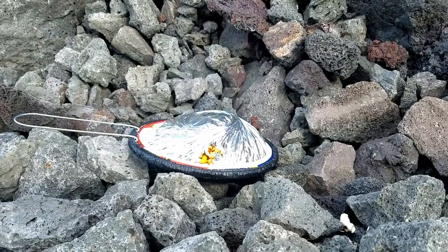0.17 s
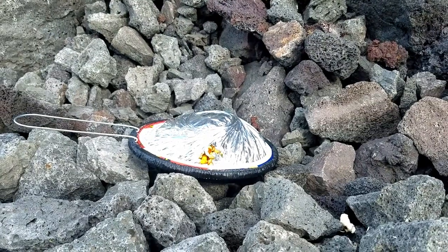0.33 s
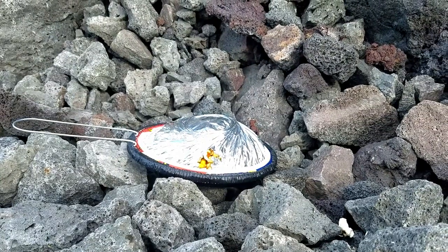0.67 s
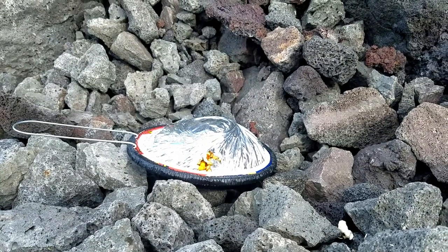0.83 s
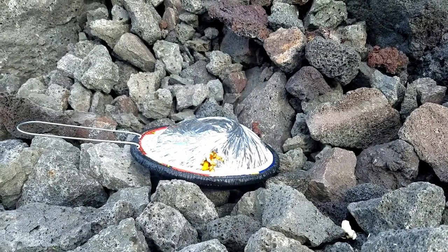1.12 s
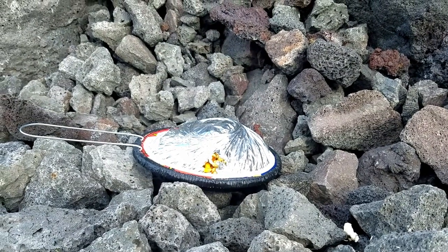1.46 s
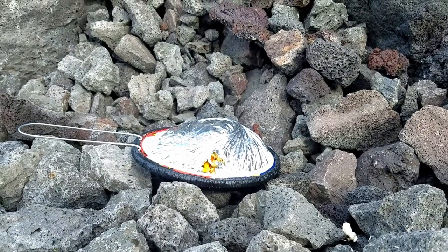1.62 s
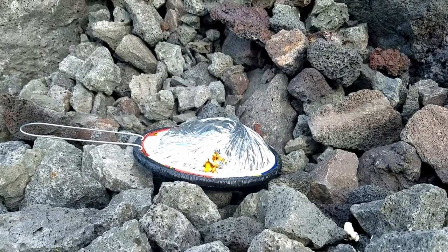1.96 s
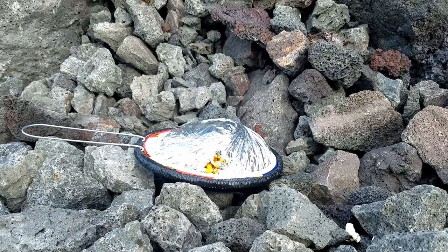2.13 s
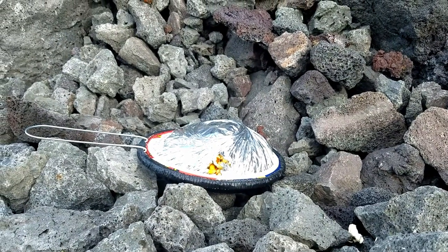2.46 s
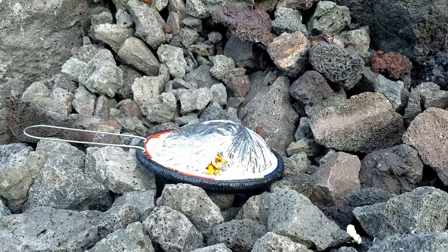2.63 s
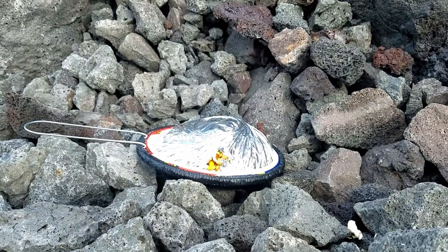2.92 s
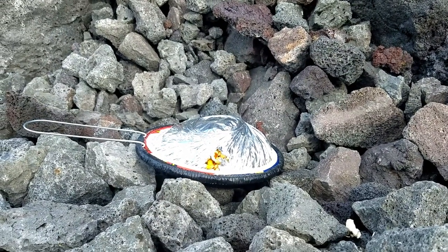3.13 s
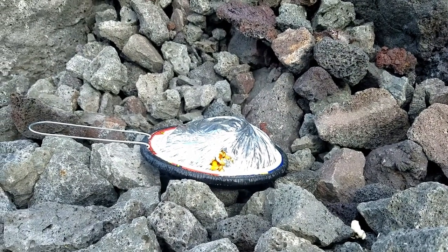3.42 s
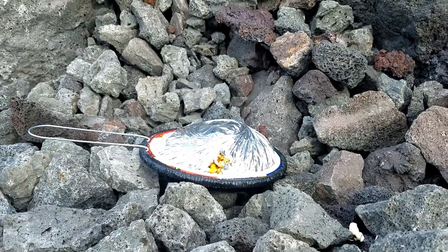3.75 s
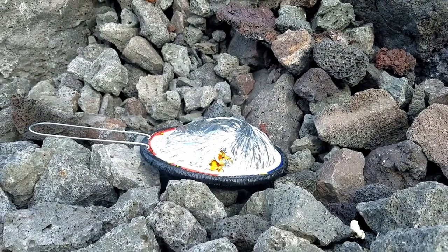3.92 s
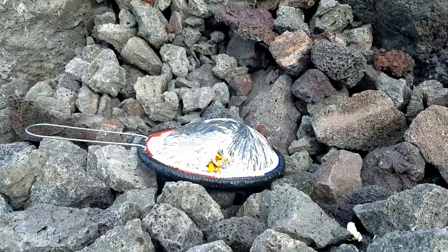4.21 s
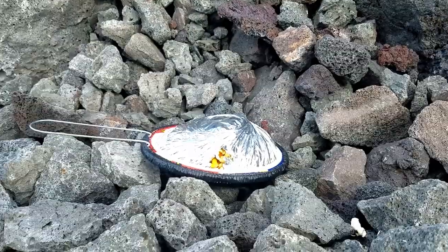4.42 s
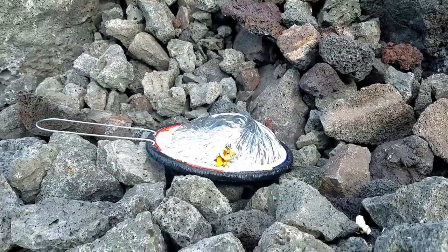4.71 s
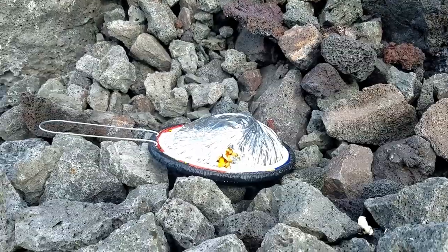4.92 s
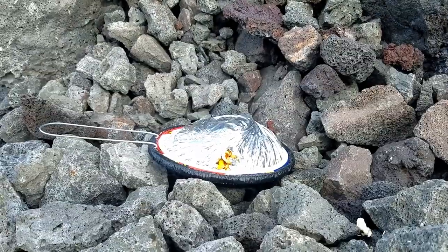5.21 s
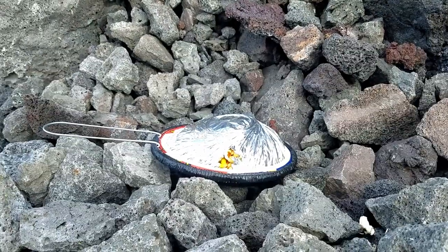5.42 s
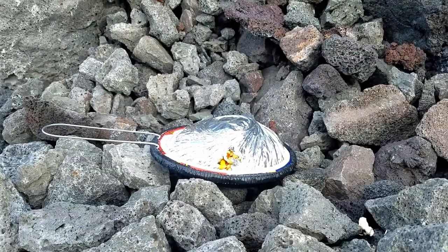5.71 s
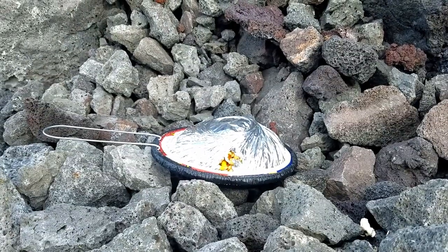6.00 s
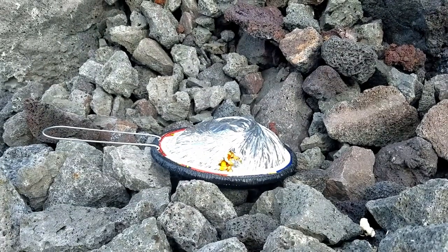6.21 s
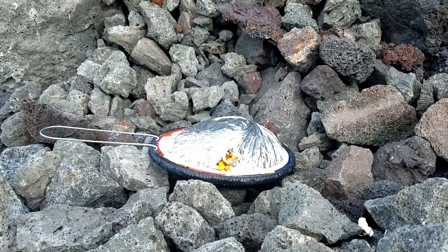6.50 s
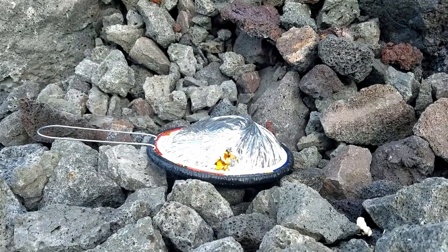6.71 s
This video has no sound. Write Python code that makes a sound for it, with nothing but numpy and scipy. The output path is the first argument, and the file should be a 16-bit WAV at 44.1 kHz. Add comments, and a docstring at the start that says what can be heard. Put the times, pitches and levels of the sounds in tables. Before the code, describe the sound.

Close outdoor stereo pickup of a foil-domed popcorn pan on rocks. Sparse dull ticks lead to a few pops, loudest just before one and a half seconds, each a tinny knock with brief rattle and settling bounces. More pops follow singly, with a long lull in the middle. Light wind rumbles low at the microphone, over quiet hiss and faint, very high insect-like whistles.

```python
"""Outdoors, close to a pan on hot rocks: popcorn bursts under the pan's foil dome, heard by two microphone ports.
Each kernel strikes the foil and bounces: clusters of knocks excite damped foil modes, with rattle and creases.
Dull single ticks, of the pan or of a kernel's small bounces, are each one short push and pull of air. Filtered
noise makes the light wind that buffets each port apart, the far wash of air and the hiss of the microphone.
Faint, very high whistles, perhaps an insect, are narrow bands of noise carried on sines."""
import sys
import numpy as np
from scipy import signal
from scipy.io import wavfile
from scipy.ndimage import uniform_filter1d

SR = 44100
rng = np.random.default_rng(int(sys.argv[2]) if len(sys.argv) > 2 else 0)


def to_linear_factor(level_db):
    """Convert decibel levels (scalar or array-like) to linear amplitude factors."""
    exponent = np.asarray(level_db, float) / 20
    return 10 ** exponent


def transcribe(signal):
    """Save signal, clipped to [-1, 1], as a 16-bit WAV file at the path in sys.argv[1]."""
    frames = np.atleast_2d(signal).T
    limited = np.clip(frames, -1, 1)
    pcm = np.round(limited * 32767).astype(np.int16)
    wavfile.write(sys.argv[1], SR, pcm)


N = 302967  # samples

# bursts of kernels: start_s, crinkle_db and snap_db (above the foil ring), push_db (low push of air),
# rattle_db (foil ring of the rattle at its start), rattle_fall_ms (to fall 6 dB)
BURSTS = [(0.971, -7.5, -7, -21, -47, 29), (1.25, -5.5, -10, -14.5, -46, 20),
          (1.4133, -5, -7, -18, -39, 10), (1.4602, -1, -13, -22, -45, 66),
          (2.3924, -8, -13, -16, -42.5, 29), (2.809, -1.5, 2.5, -6.5, -45.5, 40),
          (4.8025, -6.5, -11.5, -20, -52, 9), (4.903, -3, -6, -20.5, -41.5, 43),
          (5.677, -8.5, -5.5, -10, -44, 25), (6.496, -3.5, -4, -16, -42.5, 28)]
EDGE_HZ = 15770  # top of the steady sound


def evened(x):
    """Normalization by the mean square: scales to rms 1."""
    return x / np.sqrt(np.mean(x ** 2) + 1e-20)


def read(points, hz):
    """Spectral interpolation on a logarithmic frequency axis."""
    f, value = np.transpose(points)
    return np.interp(np.log(hz + 1), np.log(f + 1), value)


def pair(first, other, alike):
    """Partial coherence: two ports that share the part alike of their signal."""
    alike = np.clip(alike, 0, 1)
    return np.array([first, alike * first + np.sqrt(1 - alike ** 2) * other])


def noise_field(size, alike):
    """Partly coherent Gaussian noise as short-time spectra (ports, bins, frames), with frequencies and times."""
    frames = 4 * N // size + 5
    hz = np.fft.rfftfreq(size, 1 / SR)
    a, b, c, d = rng.standard_normal((frames, len(hz), 4)).T
    t = np.arange(frames) * size / 4 / SR
    return pair(a + 1j * b, c + 1j * d, read(alike, hz)[:, None]), hz, t


def to_sound(spectra, size):
    """Overlap-add synthesis: the inverse short-time transform."""
    return signal.istft(spectra, nperseg=size, noverlap=3 * size // 4)[1][:, :N]


def air():
    """Stationary shaped noise: smooth far wash and microphone hiss, whose spectrum drifts very slightly."""
    # relative spectrum: frequency_hz, density_db
    air_spectrum = [(25, -20), (45, -7), (74, -6.5), (132, -26.5), (388, -14.5), (1090, -20), (1400, -18.5),
                    (1750, -14), (2340, -18), (2600, -22.5), (5590, -30), (9730, -34.5), (12000, -29.5),
                    (15700, -29)]
    # tilt between the ports: frequency_hz, left_over_right_db
    air_balance = [(60, -6.5), (130, 3), (290, -1), (640, -3.5), (1410, 6.5), (3100, 4), (6820, 0.5),
                   (15000, 1.0)]
    # coherence of the ports: frequency_hz, alike (0-1)
    air_alike = [(400, 0.16), (1400, 0)]
    level_db, patchy_db = -58.5, -0.03
    z, hz, t = noise_field(size=2048, alike=air_alike)
    patches = rng.standard_normal((len(t), len(hz))).T
    patches = uniform_filter1d(patches, 20, 0)  # across frequency
    patches = evened(uniform_filter1d(patches, 8, 1))  # along time
    half = read(air_balance, hz) / 2
    colour_db = read(air_spectrum, hz) - 40 * (hz > EDGE_HZ) + np.array([half, -half])
    shaped = z * to_linear_factor(colour_db[..., None] + patchy_db * patches)
    return to_linear_factor(level_db) * evened(to_sound(shaped, size=2048))


def wind():
    """Turbulent pressure at nearly unrelated ports: lumpy rumble with puffs; stronger wind reaches higher."""
    # breeze between the puffs, before lumps and flutter: time_s, left_db, right_db
    breeze_table = [(0, -70, -68.5), (1.0, -73, -63.5), (2.2, -66.5, -61), (3.0, -70.5, -70.5),
                    (4.2, -64.5, -64), (5.0, -66.5, -66), (6.0, -62, -66.5), (6.87, -62, -66.5)]
    # strong puffs on one port: centre_s, level_db, port (0 left, 1 right), length_ms (between points 5 dB down)
    puff_table = [(0.113, -55, 0, 24), (0.164, -55.5, 0, 58), (0.209, -50.5, 1, 55), (0.389, -52, 1, 34),
                  (0.438, -52, 1, 16), (0.604, -46.5, 1, 27), (0.678, -54, 1, 29), (1.549, -53, 0, 46),
                  (1.669, -51, 1, 17), (2.024, -55.5, 1, 31), (3.507, -52.5, 1, 22), (3.879, -51.5, 0, 25),
                  (4.241, -54, 1, 44), (4.31, -55, 1, 20), (5.42, -53, 0, 36), (5.551, -51.5, 0, 73),
                  (5.706, -50, 0, 48), (5.971, -56, 0, 19), (6.03, -49.5, 0, 27), (6.105, -51, 0, 12),
                  (6.164, -49, 0, 91), (6.299, -45, 0, 51), (6.398, -51.5, 1, 49), (6.476, -50, 0, 67),
                  (6.631, -53.5, 0, 61)]
    # relative spectra of weak and of strong wind: frequency_hz, density_db
    calm_spectrum = [(25, -11), (60, -5.5), (120, -9.5), (220, -8), (400, -46), (800, -51)]
    gust_spectrum = [(25, -35), (60, 2.5), (120, -5), (220, -7.5), (400, -10.5), (800, -50)]
    lumps_db, flutter_db = 5.0, 2.0
    dull_db, bright_db = -66, -50  # levels at which the wind is wholly calm and wholly gusty in colour
    z, hz, t = noise_field(size=1024, alike=[(30, 0.15), (300, 0.24)])  # (Hz, coherence)

    lumps = evened(uniform_filter1d(rng.standard_normal((len(t), 2)).T, size=5))
    when, *breeze_db = np.transpose(breeze_table)
    breeze_db = np.array([np.interp(t, when, db) for db in breeze_db])
    level = to_linear_factor(breeze_db + lumps_db * lumps)
    for s, db, port, length_ms in puff_table:
        level[round(port)] += to_linear_factor(db) * np.exp(-(1500 * (t - s) / length_ms) ** 2)
    flutter = evened(uniform_filter1d(rng.standard_normal((len(t), 2)).T, size=3))
    level *= to_linear_factor(flutter_db * (flutter - .5))

    gusty = np.clip((20 * np.log10(level) - dull_db) / (bright_db - dull_db), 0, 1)[:, None]
    calm_db = read(calm_spectrum, hz)[:, None]
    gust_db = read(gust_spectrum, hz)[:, None]
    colour = to_linear_factor((1 - gusty) * calm_db + gusty * gust_db)
    colour /= np.sqrt((colour ** 2).sum(1, keepdims=True))  # the colour leaves the power alone
    steady = np.std(to_sound(z * colour, size=1024))
    return to_sound(z * colour * level[:, None], size=1024) / steady


def push_and_pull(turns):
    """Transient radiation: a cosine under a Gaussian envelope, as a function of its cycles since the start."""
    width = 0.39  # cycles
    return np.cos(2 * np.pi * (turns - .7)) * np.exp(-((turns - .6) / width) ** 2)


def ticks():
    """Impulsive radiation and reflection: each short push and pull of air has a weak echo off the rocks."""
    # dull single ticks, of the pan or of a kernel's small bounces: start_s, level_db, pitch_hz
    tick_table = [(0.145, -40.5, 1240), (0.634, -37.5, 1050), (1.046, -47, 800), (1.061, -48, 829),
                  (1.074, -47, 902), (1.086, -53, 1560), (1.118, -46, 945), (1.731, -38.5, 1160),
                  (1.869, -39.5, 1200), (2.05, -37.5, 1170), (2.225, -41, 970), (3.113, -49, 910),
                  (3.138, -46.5, 394), (3.279, -44, 750), (3.419, -42, 937), (3.55, -46.5, 783),
                  (3.684, -41.5, 977), (4.177, -41, 890), (4.764, -37.5, 930), (6.584, -34.5, 1040),
                  (6.67, -45, 1370)]
    echo_ms, echo_db = 1.73, -11
    out = np.zeros(N)
    for s, db, hz in tick_table:
        turns = np.arange(-120, 300) / SR * hz
        late = turns - echo_ms / 1000 * hz
        tick = push_and_pull(turns) + to_linear_factor(echo_db) * push_and_pull(late)
        out[round(s * SR) - 60:][:len(turns)] += to_linear_factor(db) * tick
    return out


def whistles():
    """Modulation of a carrier: slow noise on a high sine makes a narrow, fuzzy tone."""
    # faint, very high whistles, perhaps an insect: start_s, pitch_hz, level_db
    whistle_table = [(.33, 13150, -76), (.83, 13000, -76), (1.28, 12340, -68.5), (2.33, 13050, -76),
                     (3.36, 12800, -76), (3.85, 13000, -73), (4.36, 13150, -73), (4.48, 13150, -78),
                     (4.98, 13000, -72), (5.36, 13250, -72), (5.82, 13200, -71), (6.38, 13200, -73)]
    length_s, fuzz_hz = .085, 110
    out = np.zeros((2, N))
    fuzz = signal.lfilter(*signal.butter(2, fuzz_hz, fs=SR), rng.standard_normal((2, 2, N)))
    fuzz = evened(fuzz[0]) + 1j * evened(fuzz[1])
    for s, hz, db in whistle_table:
        at = np.arange(round(s * SR), round((s + length_s) * SR))
        tone = (fuzz[:, at] * np.exp(2j * np.pi * hz * at / SR)).real
        out[:, at] += to_linear_factor(db) * signal.windows.tukey(len(at), .5) * tone
    return out


def burst_at(s):
    """Causal attribution: index of the burst sounding at time s; a knock may lead its burst by lead_s."""
    lead_s = .025
    return np.maximum(np.searchsorted(np.transpose(BURSTS)[0], s + lead_s) - 1, 0)


# The next four functions return rows of start_s, ring_db, then boom_db, crinkle_db, snap_db above the ring,
# and fall_ms.
def hard_knocks():
    """Impact excitation: the bursting kernel strikes the foil, coloured by its burst and its own brightness."""
    # start_s, ring_db (foil ring), boom_db (dome boom above it), bright_db (added to the burst's crinkle
    # and snap), fall_ms (to fall 6 dB)
    knock_table = [(0.9707, -34, -16, -1, 3.5), (0.9763, -33, -12, 4, 3), (0.9833, -31.5, -1.5, -3, 3.5),
                   (0.989, -38.5, -8, -0.5, 5.5), (1.25, -39, 5, 3, 1.9), (1.2527, -28, -13, -2.5, 5),
                   (1.2635, -39.5, 2, 2.5, 1.5), (1.413, -41, -15, 0, 4), (1.416, -14.5, 2.5, 4.5, 1.6),
                   (1.4195, -12, -0.5, -6, 1.23), (1.425, -29.5, -15, 12.5, 1.7),
                   (1.4308, -30, -4, -2, 2.5), (1.4605, -12.5, -9.5, -1, 2.5), (1.4623, -23, -22, 0, 2.5),
                   (1.467, -22.5, -11, 11, 1.9), (1.4725, -29, 3.5, 3, 2.5), (1.4778, -32, -1, -4, 2),
                   (1.621, -44, -18, -5, 1.7), (2.3922, -26.5, -9, 2, 3.5), (2.399, -34.5, -17, 6.5, 3),
                   (2.4007, -23, -9.5, -12, 1.6), (2.403, -22.5, -30, 1, 1.8), (2.4082, -30, -8.5, -2, 2),
                   (2.414, -36, -22, -1, 5), (2.809, -43, -13, -12, 2), (2.813, -44, -3, 13.5, 3),
                   (2.8174, -41.5, -3, -1, 11), (2.8279, -33.5, 0.5, 1.5, 0.96), (2.8365, -44, -7, -4, 4.5),
                   (2.887, -40, -5, -4, 1.2), (2.932, -42, 3.5, -15, 1.5), (4.8023, -31, -23, -14, 5),
                   (4.8071, -21, -8.5, 2.5, 1.5), (4.8107, -21, -20, -1.5, 1.46),
                   (4.839, -47.5, -1, 10.5, 2), (4.9035, -33, -8, -10, 1.5), (4.905, -18.5, -8.5, 3.5, 1.5),
                   (4.9109, -23.5, 0.5, 0, 3), (4.9157, -23.5, -20, -6, 1.6), (5.6554, -41.5, 3, 0, 1.5),
                   (5.6765, -36.5, 2, 8, 1.56), (5.6829, -46.5, -19, 2.5, 14), (5.6951, -36, 3.5, 0, 1.7),
                   (5.701, -36, -12, -5, 2), (6.4971, -27.5, 5, 1, 2.5), (6.4992, -24.5, 3, 3.5, 2.5),
                   (6.503, -26.5, -7, -3, 3.5)]
    rows = []
    for s, db, boom_db, bright_db, fall_ms in knock_table:
        _, crinkle_db, snap_db, *_ = BURSTS[burst_at(s)]
        rows.append((s, db, boom_db, crinkle_db + bright_db, snap_db + bright_db, fall_ms))
    return rows


def rattle():
    """Decaying random impacts: small bounces after each burst weaken at the burst's own rate."""
    count, span = 10, 2.2  # bounces per burst, spread over so many 6 dB fall times
    wait_ms, spread_db, fall_ms = 14, 5.5, 2.7
    boom_db, duller_db = -8, (-9, -7)  # duller: crinkle and snap against the burst
    rows = []
    chance = rng.random((len(BURSTS), count, 2))
    for (start, *colour, _, db, fade_ms), draws in zip(BURSTS, chance):
        for k, (place, size) in enumerate(draws):
            falls = span * (k + place) / count
            s = start + (wait_ms + falls * fade_ms) / 1000
            level_db = db - 6 * falls + spread_db * (2 * size - 1)
            rows.append((s, level_db, boom_db, *np.add(colour, duller_db), fall_ms))
    return rows


def bounces():
    """Soft-contact excitation: the puffed kernel settles in dull bounces, weak in treble."""
    # start_s, ring_db (foil ring), crinkle_db (above it), fall_ms (to fall 6 dB)
    bounce_table = [(1.0208, -45, -11, 1.5), (1.494, -35, -17, 0.7), (1.505, -33.5, -9, 1.8),
                    (1.52, -34.5, -18, 1.2), (1.527, -41, -5.5, 5), (1.541, -43.5, -9, 6),
                    (1.571, -39, -10.5, 3.5), (1.5926, -46, -12, 5.6), (1.633, -44, -18, 2),
                    (1.6535, -50, -11, 5.5), (2.4547, -43, -13, 1), (2.4854, -43, -22, 1.4),
                    (2.866, -49, -14, 2), (2.9653, -40, -18, 1.7), (4.9326, -35, -18, 1.5),
                    (4.9478, -35.5, -19, 2), (4.9633, -46, -20, 6), (4.9734, -33, -12, 1.05),
                    (4.986, -46, -14, 5), (4.993, -44, -13, 1.3), (5.739, -44, -18, 1.5),
                    (6.5145, -26, -22, 1.3), (6.5262, -43, -19, 4)]
    boom_db, snap_db = -13, -20
    return [(s, db, boom_db, crinkle_db, snap_db, fall_ms) for s, db, crinkle_db, fall_ms in bounce_table]


def creases():
    """Sudden release of strain: lone creases of the foil let go, mostly in the treble."""
    # start_s, ring_db (foil ring)
    crease_table = [(1.6023, -59), (1.608, -60), (1.64, -59), (2.2823, -68), (4.6228, -65)]
    boom_db, crinkle_db, snap_db, fall_ms = 1, 3, 12, 1.7
    return [(s, db, boom_db, crinkle_db, snap_db, fall_ms) for s, db in crease_table]


def ringing(modes, low_hz):
    """Modal superposition: damped modes start together, energy 1; the small pan radiates little bass."""
    t = np.arange(1500) / SR
    ring = np.zeros(len(t))
    for hz, width, db in modes:
        decay = np.sqrt(width) * np.exp(-np.pi * width * t)
        ring += to_linear_factor(db) * decay * np.sin(2 * np.pi * hz * t)
    ring = signal.sosfilt(signal.butter(4, low_hz, "high", fs=SR, output="sos"), ring)
    return ring / np.linalg.norm(ring)


def pops():
    """Excitation and resonance: sharp strikes, then tiny snaps of the shaking, creased foil, drive its modes."""
    # modes of the dome's boom and of the foil's ring, crinkle and snap: pitch_hz, width_hz, level_db
    boom_modes = [(405, 40, -2.5), (499, 120, 3), (670, 118, 2)]
    ring_modes = [(763, 110, -8.5), (1048, 69, -0.5), (1240, 150, 2), (1468, 240, 1.5), (1686, 260, 5),
                  (1970, 280, -5)]
    crinkle_modes = [(3070, 1360, 8.5), (3670, 860, -1), (4260, 520, -7), (4960, 5500, -15.5)]
    snap_modes = [(6750, 440, -3), (7920, 4300, 1), (11740, 1800, 2), (12960, 850, -7.5)]
    # each with the coherence of its shaking noise between the ports (0-1)
    bodies = (boom_modes, 0.95), (ring_modes, 0.68), (crinkle_modes, 0.3), (snap_modes, 0.7)
    rise, spiky_db, strike_db, brief_ms = 0.25, 4.0, 14, 1.52  # rise in fall times
    tail_db, tail_ms, push_hz = -27, 16, 240  # the tail falls 6 dB in tail_ms

    t_ms = np.arange(5000) / SR * 1000
    shake, strikes = np.zeros((2, 4, N + len(t_ms)))  # power of the shaking, amplitude of the strikes
    quicker = np.array([[.8], [1], [1.2], [1.5]])  # treble dies sooner
    knocks = hard_knocks() + rattle() + bounces() + creases()
    signs = rng.choice([-1, 1], (len(knocks), 1))
    for (s, ring_db, boom_db, crinkle_db, snap_db, fall_ms), sign in zip(knocks, signs):
        at = round(s * SR)
        brief = np.exp(-(fall_ms / brief_ms) ** 2)  # a brief knock is mostly strike, a long one mostly shaking
        fall = (1 - brief) * to_linear_factor(-6 * quicker * t_ms / fall_ms)
        fall = fall + to_linear_factor(tail_db - 6 * quicker * t_ms / tail_ms)
        onset = 1 - np.exp(-t_ms / (rise * fall_ms))
        parts = to_linear_factor(ring_db + np.array([boom_db, 0, crinkle_db, snap_db]))
        shake[:, at:][:, :len(t_ms)] += (parts[:, None] * onset * fall) ** 2
        strikes[:, at] = sign * parts * to_linear_factor(strike_db) * np.sqrt(brief)

    spikes = to_linear_factor(spiky_db * np.minimum(rng.exponential(1, N), 5))  # creases let go unevenly
    out = np.zeros((2, N))
    for power, strike, (modes, alike) in zip(shake, strikes, bodies):
        snaps = evened(spikes * pair(*rng.standard_normal((2, N)), alike))
        drive = snaps * np.sqrt(power[:N]) + strike[:N]
        out += signal.oaconvolve(drive, ringing(modes, low_hz=0.87 * modes[0][0])[None])[:, :N]
    out[1] = np.roll(out[1], 1)  # the pan is a little nearer to the left port

    # the dome heaves: a low push of air that follows the ring's shaking
    push = evened(signal.lfilter(*signal.butter(2, push_hz, fs=SR), rng.standard_normal(N)))
    heave = np.sqrt(abs(uniform_filter1d(shake[1, :N], size=400, origin=199)))
    push_db = np.transpose(BURSTS)[3][burst_at(np.arange(N) / SR)]
    return out + to_linear_factor(push_db) * push * heave


def scene():
    """Linear superposition of all sources at the two ports."""
    return air() + wind() + ticks() + whistles() + pops()


def roll_off(x):
    """The treble ends steeply here."""
    return signal.sosfilt(signal.butter(12, 16820, fs=SR, output="sos"), x)


def record(dry):
    """Band-limiting: a sharp treble edge with a weak leak above it, then a small offset in the converter."""
    leak_db, offset = -24, -.0008
    edge = signal.firwin(801, EDGE_HZ, window=("kaiser", 8), fs=SR)
    low = signal.oaconvolve(dry, edge[None], "same")
    mix = low + to_linear_factor(leak_db) * (dry - low) + offset
    return roll_off(mix)


dry = scene()
out = record(dry)
transcribe(out)
```